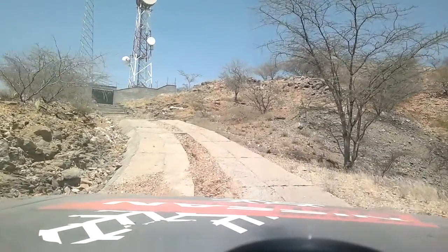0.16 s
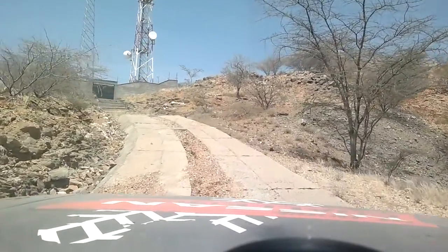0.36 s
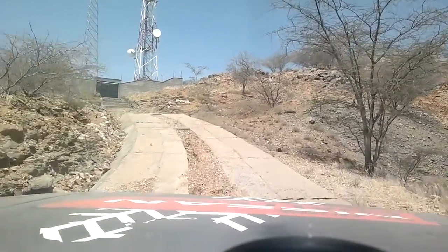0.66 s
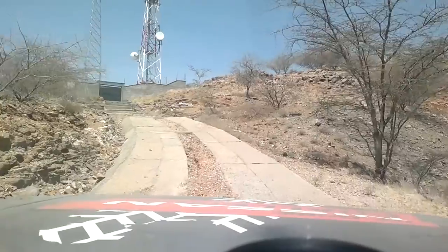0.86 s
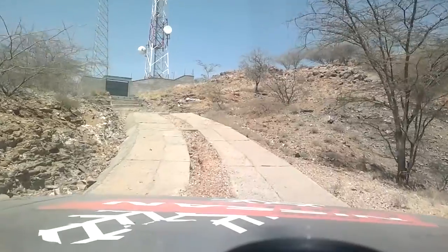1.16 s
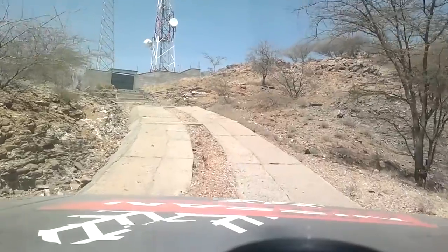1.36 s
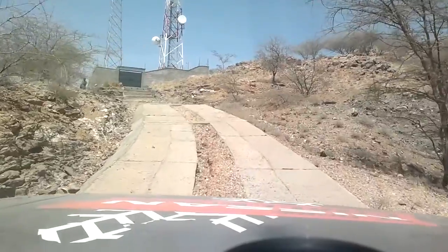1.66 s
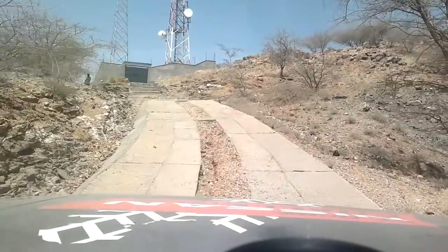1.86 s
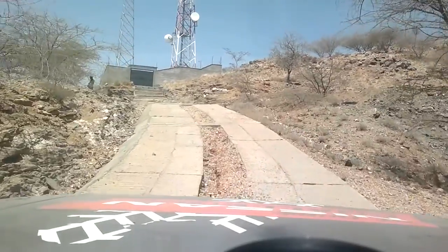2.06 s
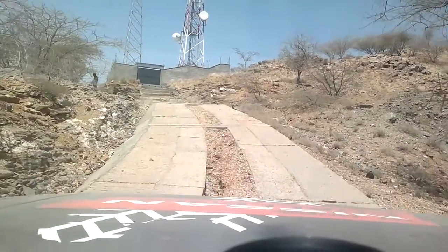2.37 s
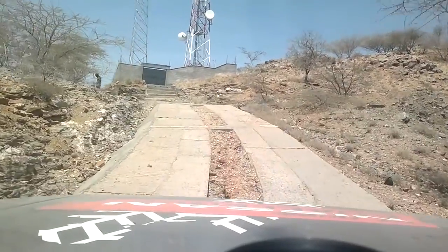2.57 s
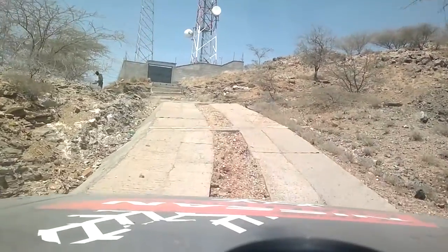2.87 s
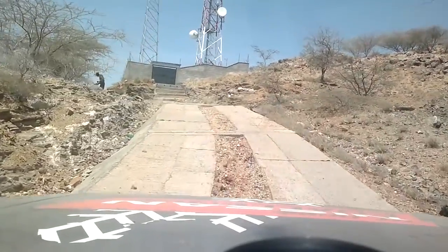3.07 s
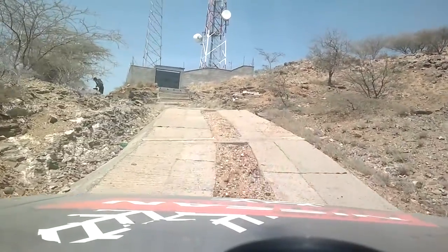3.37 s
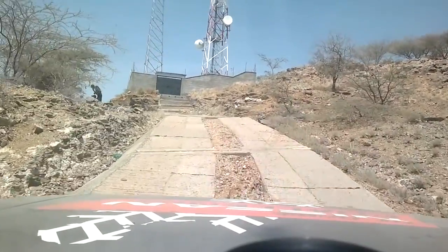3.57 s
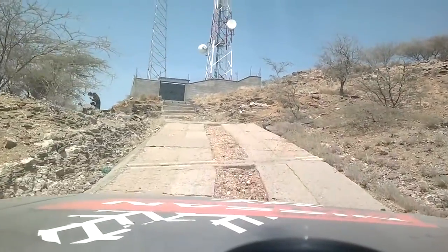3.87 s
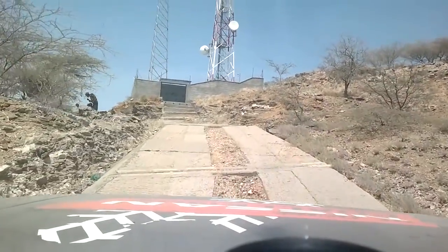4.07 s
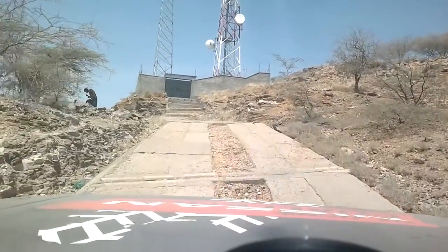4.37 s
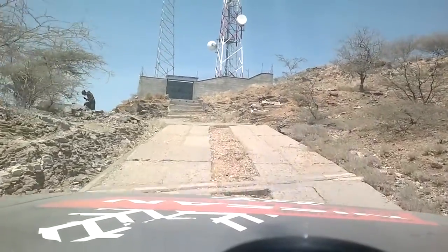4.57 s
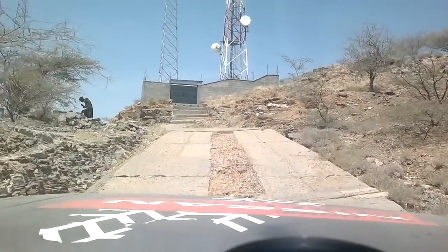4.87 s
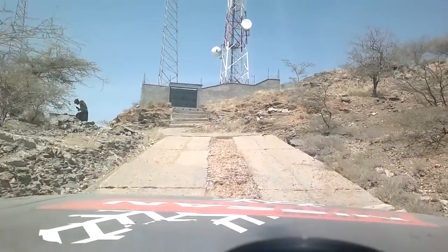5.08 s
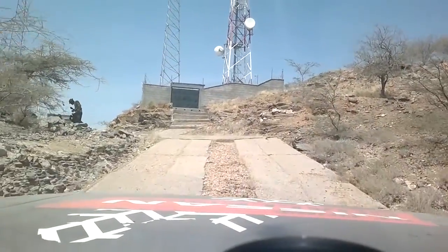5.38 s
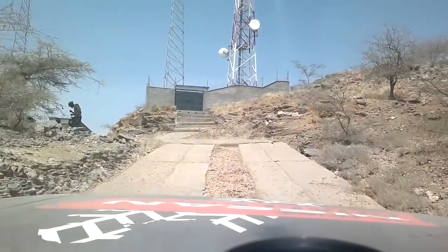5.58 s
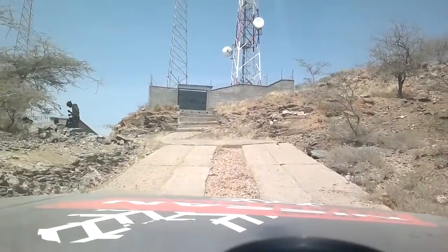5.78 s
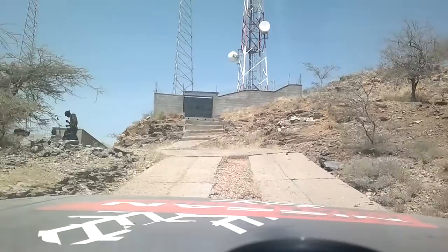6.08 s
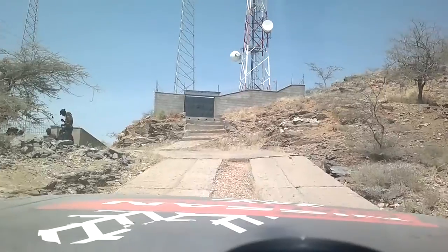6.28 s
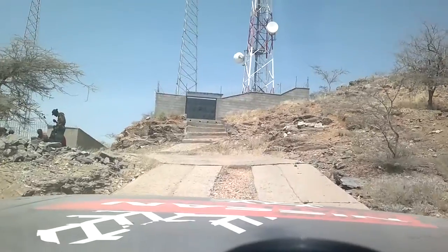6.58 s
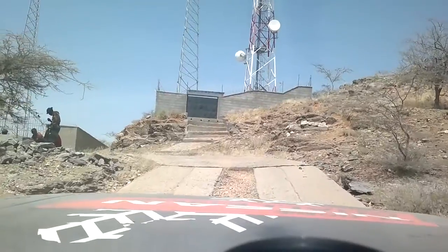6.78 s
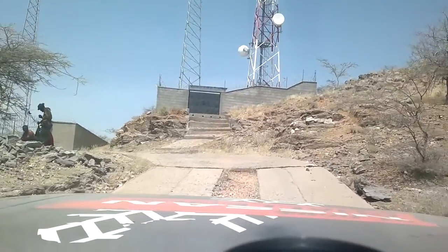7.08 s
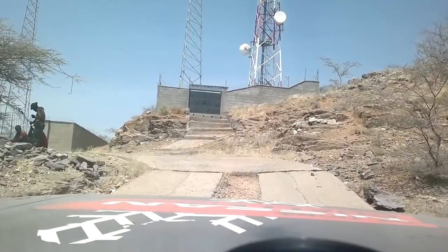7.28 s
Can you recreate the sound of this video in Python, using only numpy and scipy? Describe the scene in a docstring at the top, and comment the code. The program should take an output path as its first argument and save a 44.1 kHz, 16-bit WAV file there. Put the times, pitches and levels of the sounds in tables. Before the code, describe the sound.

Heard from inside a pickup cab, a diesel climbs a steep concrete track. Deep booms surge over slab bumps above steady tyre rumble, while plastic trim chirps and squeaks irregularly and fittings rustle. The engine drone rises slightly until about four seconds, with spells of gear hum and a faint metallic jingle, then eases and sags in pitch as short bumps come faster.

```python
"""A diesel pickup crawls up a steep concrete track, heard from inside the cab.
From the start the body booms over bumps in the slabs, tyres rumble, trim squeaks and fittings rustle.
The six-cylinder engine, a sum of crank orders and knocked noise, quickens until about 4 s; from about
2.2 s its gears hum in spells, and from about 2.5 s a loose metal part jingles as the body swings.
After 5.5 s the gear hum sinks, the engine eases off and its speed sags while the bumps come on."""
import sys
import numpy as np
from scipy import signal
from scipy.fft import rfft, irfft
from scipy.io import wavfile

SR = 44100
rng = np.random.default_rng(int(sys.argv[2]) if len(sys.argv) > 2 else 0)


def dump_mix(stems):
    """Bounce the given channels to the path in sys.argv[1] as a 16-bit WAV at rate SR."""
    frames = np.atleast_2d(stems).T  # one column per channel
    limited = np.clip(frames, -1, 1)  # hard clip at full scale
    pcm = np.round(limited * 32767).astype(np.int16)
    wavfile.write(sys.argv[1], SR, pcm)


N = 327654
TIME = np.arange(N) / SR
HZ = np.fft.rfftfreq(N, 1 / SR)

# how hard the truck works:
# (time [s], tyre rumble level [dB], clatter level before trim [dB], tread roar level [dB])
EFFORT = [(0.05, -22.5, -39, -43), (0.3, -27, -42.5, -43), (0.9, -30, -44, -46.5), (1.35, -29, -44, -45),
          (2.05, -28.5, -43.5, -44), (2.6, -26.5, -41, -40.5), (2.95, -28.5, -42, -44),
          (3.45, -25.5, -40, -41), (3.95, -31, -42.5, -44), (4.8, -28.5, -42.5, -43.5),
          (5.35, -24, -40.5, -41.5), (5.95, -29, -44, -45), (6.3, -24, -41.5, -40.5), (6.65, -24, -41, -42),
          (7.05, -25, -43, -45), (7.4, -25.5, -40, -41)]
# spectrum of the road rumble: (frequency [Hz], relative level [dB per Hz])
ROAD_SPECTRUM = [(12, -17), (23, 8), (29, 10.5), (48, 11.5), (65, 2.5), (100, -0.5), (140, 0.5),
                 (200, -1.5), (240, -6.5), (268, -6.5), (288, -7), (325, -11), (400, -19.5), (1000, -65.5)]
# spectrum of the tread roar: (frequency [Hz], relative level [dB per Hz])
ROAR_SPECTRUM = [(250, -22.5), (360, 0), (435, -0.5), (470, -3), (515, -4), (555, -12.5), (605, -6.5),
                 (700, -18), (1500, -52.5)]

# dry rustle of the shaken cab fittings: (time [s], level before trim [dB])
RUSTLE_LEVEL = [(0.02, -51), (0.2, -68), (0.37, -68), (0.52, -60.5), (0.66, -67), (0.93, -61.5),
                (1.42, -74), (1.79, -65), (1.98, -67.5), (2.39, -62), (2.81, -67), (4.1, -67), (5.4, -60.5),
                (5.82, -61.5), (6.7, -64), (7.03, -71), (7.3, -63), (7.43, -60)]
# spectrum of the rustle: (frequency [Hz], relative level [dB])
RUSTLE_SPECTRUM = [(2000, -23.0), (3500, 3.5), (5000, -2.5), (5800, -3.5),
                   (6800, -2.5), (8400, -7.5), (9300, -15.0), (10200, -8.5)]

# modes of the small loose metal part: (frequency [Hz], relative level [dB], time to fall 60 dB [s])
METAL_MODES = [(7335, -3, .06), (7369, -1, .09), (7698, -10, .1), (8060, -10, .1), (8430, -11, .1),
               (8850, -14, .1), (9204, -12, .12), (9600, -18, .1), (9930, -15, .12)]
# spells in which it is shaken: (middle [s], length [s], level [dB])
JINGLE_SPELLS = [(3.2, 1.3, -69), (5.5, 1.6, -72), (6.12, .25, -66), (6.39, .5, -61), (7.1, .9, -74)]

# resonances of the squeaking panel: (frequency [Hz], width [Hz], lift [dB])
PANEL_MODES = [(4025, 40, 4), (4240, 35, 8), (4330, 35, 7), (4400, 35, 3), (4480, 30, 5.5), (4570, 35, 3),
               (4705, 30, 8), (7650, 120, 5), (8030, 60, 3), (8680, 120, 5)]
# slips of the trim, levels before the panel: (start [s], length [s], level [dB], middle pitch [Hz],
# glide from start to end [Hz], octave level [dB], roughness [0 = smooth, about 1 = roughest])
SQUEAK_SLIPS = [(0, 0.07, -55.5, 4030, 94, -67, 1.2), (0.029, 0.078, -56, 4360, -100, -71, 0.74),
                (0.211, 0.04, -57.5, 4550, -100, -87, 0.58), (0.25, 0.06, -58, 4380, 178, -85, 0.5),
                (0.3, 0.05, -58, 3900, 1, -63, 0.75), (0.404, 0.077, -53, 4260, 0, -66, 0.53),
                (0.489, 0.1, -58, 4340, 221, -80, 0.8), (0.652, 0.043, -56.5, 4660, 136, -76, 0.38),
                (0.768, 0.072, -58.5, 4060, 63, -66, 0.8), (0.82, 0.17, -65, 4450, 1, -82, 0.68),
                (0.885, 0.042, -53, 4000, -86, -58, 0.4), (1.074, 0.08, -61, 4100, 400, -79, 0.9),
                (1.312, 0.11, -67.5, 4530, -2, -88.5, 0.4), (1.496, 0.057, -56.5, 4310, -100, -79, 0.57),
                (1.755, 0.074, -57, 4520, -560, -71, 0.7), (1.807, 0.17, -64, 3970, 0, -72, 0.5),
                (2.112, 0.11, -55.5, 4280, 87, -72, 0.58), (2.273, 0.035, -56, 3850, 0, -65, 0.7),
                (2.31, 0.042, -57, 4400, 60, -73, 0.48), (2.333, 0.087, -59, 4020, 0, -66, 1),
                (2.394, 0.064, -55.5, 4380, 121, -78, 0.4), (2.58, 0.046, -53, 3830, -2, -60, 0.3),
                (2.634, 0.052, -54, 4250, -65, -74, 0.58), (2.723, 0.053, -57, 4320, 98, -83.0, 0.5),
                (2.787, 0.082, -56.5, 4320, -220, -74.5, 0.47), (3.045, 0.04, -61, 4570, 0, -75, 0.6),
                (3.109, 0.07, -63, 4550, 200, -72, 0.6), (3.195, 0.064, -59, 4440, 1, -80, 0.4),
                (3.327, 0.027, -54.5, 4290, -3, -75, 0.63), (3.402, 0.15, -53.5, 4290, -58, -70, 0.8),
                (3.624, 0.1, -59.5, 4490, 197, -75, 0.65), (3.706, 0.156, -54.5, 4360, 0, -71.5, 0.37),
                (3.898, 0.09, -58.5, 4410, -57, -81, 0.52), (4.021, 0.05, -60.5, 4280, 0, -73, 0.43),
                (4.263, 0.083, -54.5, 4350, 0, -70.0, 0.5), (4.344, 0.14, -56.5, 4395, -1, -72, 0.35),
                (4.389, 0.021, -45, 4335, -5, -63, 0.25), (4.582, 0.11, -59, 4270, -50, -72, 0.45),
                (4.807, 0.056, -58, 4370, -100, -75, 0.6), (5.287, 0.047, -57, 4050, 115, -65.5, 0.6),
                (5.325, 0.14, -64, 4410, -7, -74, 0.5), (5.46, 0.079, -55, 4550, -100, -68, 0.55),
                (5.55, 0.051, -61.5, 4010, -2, -61, 0.38), (5.667, 0.05, -58, 4420, 0, -73, 0.7),
                (5.882, 0.091, -55, 4390, -43, -72, 0.53), (6.07, 0.056, -60, 4380, 0, -70, 0.68),
                (6.292, 0.029, -55, 4130, 100, -63, 0.78), (6.305, 0.043, -53, 4350, 0, -73, 0.65),
                (6.39, 0.065, -57, 4460, 82, -79, 0.52), (6.474, 0.057, -54.5, 4490, 4, -69.5, 0.8),
                (6.607, 0.1, -59, 3990, 199, -67, 1), (6.67, 0.083, -60, 4540, 0, -72, 0.8),
                (6.771, 0.06, -58, 4050, 100, -61, 0.97), (6.812, 0.026, -52, 4350, 0, -67, 0.55),
                (6.852, 0.082, -57, 4550, 0, -67.5, 0.68), (6.918, 0.056, -55, 4330, 0, -76, 0.3),
                (7.056, 0.039, -52.5, 4420, 4, -72, 0.9), (7.08, 0.032, -60, 4020, 3, -59, 0.38),
                (7.151, 0.043, -58, 4320, -120, -78.5, 0.6), (7.267, 0.059, -54, 4000, 221, -65, 0.68),
                (7.35, 0.068, -54, 4540, 60, -68, 0.6)]
# spectrum of the scrape of a rough slip: (frequency [Hz], relative level [dB per Hz])
SCRAPE_SPECTRUM = [(1500, -26), (3300, -2.5), (4000, 6.5), (5000, -1.5), (6800, -8), (8000, 0.5),
                   (9000, -13.5), (10500, -28.5)]

# bumps in the slabs, each a surge of the boom: (middle [s], length [s], level [dB])
BUMPS = [(0.06, 0.11, -9), (0.27, 0.8, -16.5), (0.52, 0.085, -10.5), (0.6, 0.12, -10.5), (0.77, 0.48, -10),
         (1.12, 0.32, -24), (1.3, 0.22, -11), (1.45, 0.19, -19.5), (1.73, 0.36, -11), (2.02, 0.23, -14),
         (2.63, 0.39, -11.5), (2.9, 0.3, -18.5), (3.3, 0.33, -14), (3.64, 0.36, -9), (3.84, 0.27, -9),
         (4.3, 0.3, -18.5), (4.55, 0.53, -13), (5.06, 0.38, -15.5), (5.42, 0.069, -14), (5.58, 0.21, -9),
         (5.79, 0.26, -15), (5.92, 0.043, -14.5), (6.05, 0.065, -13), (6.19, 0.067, -22),
         (6.5, 0.062, -14.5), (6.61, 0.064, -9.5), (6.69, 0.075, -10), (6.8, 0.088, -16.5),
         (7.05, 0.089, -11)]

# engine speed: (time [s], crank speed [turns/s])
CRANK_SPEED = [(0, 25.85), (0.9, 26.3), (1.2, 26.1), (1.85, 26.6), (2.15, 27.9), (2.42, 27.75),
               (2.68, 28.5), (2.85, 28.1), (3.05, 28.85), (3.27, 28.6), (3.55, 29.15), (3.8, 28.8),
               (4.08, 29.25), (4.33, 28.65), (4.52, 28.95), (4.8, 28.35), (5.15, 28.2), (5.55, 27.8),
               (5.8, 26.8), (6.05, 26.45), (6.3, 25.5), (7.0, 23.35), (7.43, 23.6)]
# gear hum, strong only while the engine runs fast: (time [s], level [dB])
GEAR_LEVEL = [(0, -58), (2.05, -57), (2.25, -46), (2.45, -50), (2.74, -39.5), (2.87, -53), (3.1, -41.5),
              (3.33, -51), (3.5, -40), (4.0, -43.5), (4.3, -47), (4.55, -42.5), (4.9, -51), (5.2, -42),
              (5.8, -57)]
# spectrum of the clatter through the bulkhead: (frequency [Hz], relative level [dB per Hz])
CLATTER_SPECTRUM = [(200, -14), (500, -1), (700, -4.5), (900, -0.5), (1150, -2.5), (1400, -5.5),
                    (1800, -6.5), (2300, -9), (3000, -13.5), (3700, -17), (5000, -20.5), (7000, -26),
                    (8800, -37), (10000, -40)]
# ringing parts of the engine: (frequency [Hz], width [Hz], level [dB])
ENGINE_RINGS = [(746, 20, -61), (1055, 26, -62), (1275, 26, -57), (1464, 22, -60.5), (1530, 26, -63),
                (1606, 26, -61.5), (1760, 30, -66), (1975, 30, -65.5), (2220, 100, -63), (2380, 70, -65),
                (2830, 70, -70), (3370, 100, -70)]
# unlike cylinders, in firing order: (relative knock strength)
CYLINDER_STRENGTH = np.array([1, -1, 0, 1, 0, -1])
# how far the engine eases off: (time [s], easing [0-1])
EASING = [(0, 0.31), (2, 0.07), (5.7, 0), (6.3, 0.93), (7.43, 0.9)]
# the two strong, clean engine tones: (time [s], firing tone level [dB], its octave level [dB])
CLEAN_TONES = [(0, -35, -41), (0.35, -44, -38), (1.0, -39, -42), (1.6, -42, -39), (1.8, -34, -43),
               (2.0, -41, -44), (2.17, -28, -36), (2.45, -33, -41), (2.95, -30, -34), (3.15, -34.5, -28.5),
               (3.7, -31, -35), (4.23, -35, -29), (4.57, -38, -39), (4.85, -30, -32), (5.45, -27, -34),
               (5.78, -36, -43), (6.3, -37, -48), (7.43, -36, -45)]
# weaker, less steady orders, before the cab's lift:
# (multiple of crank speed, level while pulling [dB], level while easing off [dB])
WEAK_ORDERS = [(4, -45, -50), (4.5, -45.5, -48), (5, -40.5, -50), (7, -43, -50), (7.5, -48, -41.5),
               (8.5, -46.5, -41), (9, -54, -50), (11, -55, -55)]
# air resonances of the cab: (frequency [Hz], width [Hz], lift [dB])
CAB_MODES = [(175, 13, 7.5), (203, 14, 4.5), (224, 10, 5), (246, 10, 4), (286, 14, 4)]

SQUEAK_ATTACK_S, SQUEAK_RELEASE_S = 0.006, 0.036  # catches quickly, lets go more slowly
SQUEAK_JITTER_HZ = 175  # rms at roughness 1
CAB_T60_S, CAB_WET = .19, .85  # echo decay time, and level against the direct sound
BOOM_HZ, BOOM_DRIFT_HZ = 36.1, 1.2  # the body's lowest mode, and its rms drift
TREMBLE_DB = -26  # middle level of the boom between bumps
FIRINGS_PER_TURN, GEAR_ORDER = 3, 14  # cycles in each turn of the crank
KNOCK = .65  # typical strength of each knock over the steady clatter
KNOCK_DECAY = .5  # share of the gap between firings in which a knock falls to 1/e
SHAKE_DB = -28.5  # level of the crank shake
WAVER_DB, SLIP_RAD = 1.7, .22  # rms waver in level and slip in phase of the weaker orders


def amp(db):
    """Level law: decibels to amplitude gain."""
    return 10 ** (np.asarray(db) / 20)


def unit(x):
    """Normalisation of power: scales to rms 1."""
    return x / np.sqrt(np.mean(x ** 2) + 1e-20)


def curves(rows):
    """Linear interpolation: one value per sample for each column of a table over time."""
    s, *columns = np.transpose(rows)
    return [np.interp(TIME, s, c) for c in columns]


def colour(x, points):
    """Spectral shaping: filters x by a spectrum drawn on a log-frequency axis, to rms 1."""
    f, db = np.transpose(points)
    gain = amp(np.interp(np.log(HZ + 1), np.log(f), db))
    return unit(irfft(rfft(x) * gain, N))


def wander(rate):
    """Low-passed chance: noise of rms 1 whose spectrum falls to 1/e at rate in Hz."""
    return unit(irfft(rfft(rng.standard_normal(N)) * np.exp(-(HZ / rate) ** 2), N))


def turns(hz):
    """Phase as the integral of frequency, in radians."""
    return 2 * np.pi * np.cumsum(hz) / SR


def swells(rows):
    """Power addition: gain curve of rounded surges, one for each (middle, length, level)."""
    power = 0
    for middle, length, db in rows:
        surge = amp(db) * np.cos(np.pi * np.clip((TIME - middle) / length, -.5, .5))
        power = power + surge ** 2
    return np.sqrt(power)


def lift(hz, resonances):
    """Resonance: decibels added at hz by a set of bell-shaped peaks."""
    return sum(db / (1 + (2 * (hz - centre) / width) ** 2) for centre, width, db in resonances)


def road(rumble_db, roar_db, patchy_db=1.5):
    """Broadband rolling excitation: tyres on rough concrete rumble through the floor, and their tread roars."""
    rumble = colour(rng.standard_normal(N), ROAD_SPECTRUM) * amp(rumble_db)
    roar = colour(rng.standard_normal(N), ROAR_SPECTRUM) * amp(roar_db)
    return (rumble + roar) * amp(patchy_db * wander(13))


def rustle(grain_db=0.0, clump_db=3.0, trim_db=4.5):
    """Frictional noise: fittings chafe against each other in many tiny slips."""
    slips = rng.standard_normal(N) * amp(grain_db * wander(150) + clump_db * wander(19))
    level_db = curves(RUSTLE_LEVEL)[0] + trim_db
    return amp(level_db) * colour(slips, RUSTLE_SPECTRUM)


def jingle(sway, uneven_db=2.0, contact_s=0.0043):
    """Free vibration after impact: a loose metal part is tapped once in each swing of the body."""
    swing_starts = np.diff(np.floor(sway / (2 * np.pi)), prepend=0)
    taps = swing_starts * amp(uneven_db * rng.standard_normal(N))
    t = TIME[:SR // 5]
    ring = sum(amp(db - 60 * t / t60) * np.sin(2 * np.pi * hz * t) for hz, db, t60 in METAL_MODES)
    ring = ring * (1 - np.exp(-t / contact_s))  # soft onset
    return swells(JINGLE_SPELLS) * unit(signal.fftconvolve(taps, ring)[:N])


def panel(x):
    """Forced resonance: the panel passes a squeak on and rings briefly at its own modes."""
    gain = 1 + sum((amp(db) - 1) / (1 + 2j * (HZ - hz) / width) for hz, width, db in PANEL_MODES)
    return irfft(rfft(x) * gain, N)


def squeak(sway, rest_hz=4400, creep_db=-73, scrape_db=-3.0, flutter_db=2.5, throb_db=2.5):
    """Stick-slip friction: trim creeps faintly and breaks into short gliding squeaks as the cab twists."""
    jitter = SQUEAK_JITTER_HZ * wander(350)
    wobble_hz = 35 * np.sin(sway)
    scrape = amp(scrape_db) * colour(rng.standard_normal(N), SCRAPE_SPECTRUM)
    out = amp(creep_db) * np.sin(turns(rest_hz + jitter))
    for start, length, db, pitch_hz, glide_hz, octave_db, rough in SQUEAK_SLIPS:
        end = start + length + SQUEAK_RELEASE_S
        now = slice(max(0, round(start * SR)), round(end * SR))
        t = TIME[now] - start
        release = (length - t) / SQUEAK_RELEASE_S + .5  # half the release lies beyond length
        envelope = np.clip(np.minimum(t / SQUEAK_ATTACK_S, release), 0, 1)
        glide = glide_hz * (t / length - .5)
        angle = turns(pitch_hz + glide + rough * (jitter[now] + wobble_hz[now]))
        tone = amp(db) * np.sin(angle) + amp(octave_db) * np.sin(2 * angle)
        out[now] += envelope * (np.sqrt(2) * tone + rough * amp(db) * scrape[now])
    # all slips flutter, and throb with the body's swing
    throb = unit(amp(flutter_db * wander(170) + throb_db * np.sin(sway)))
    return panel(out * throb)


def cab_echo(x):
    """Diffuse reverberation: glass and panels scatter high sounds into a short, dense tail."""
    t = TIME[:round(CAB_T60_S * SR)]
    tail = rng.standard_normal(len(t)) * amp(-60 * t / CAB_T60_S)
    echo = signal.fftconvolve(x, tail / np.linalg.norm(tail))[:N]
    return (x + CAB_WET * echo) / np.hypot(1, CAB_WET)


def body(sway, tremble_spread_db=3.5):
    """Excitation of the lowest mode: the body trembles all the way, and each bump makes its boom surge."""
    tremble = amp(TREMBLE_DB + tremble_spread_db * wander(22.0))
    return np.sqrt(2) * np.hypot(tremble, swells(BUMPS)) * np.sin(sway)


def gears(crank, slip_rad=0.55):
    """Tooth-meshing tone: the gears hum in short spells at a fixed multiple of the crank speed."""
    angle = turns(GEAR_ORDER * crank) + slip_rad * wander(10)
    return np.sqrt(2) * amp(curves(GEAR_LEVEL)[0]) * np.sin(angle)


def clatter(crank, level_db, uneven_db=1.5, trim_db=-1.1):
    """Impulsive combustion: each firing knocks noise out of the block and sets engine parts ringing."""
    firings = FIRINGS_PER_TURN * turns(crank) / (2 * np.pi)
    cylinder_db = uneven_db * CYLINDER_STRENGTH[firings.astype(int) % 6]
    burn_db = 4 * np.tanh(wander(60))  # no two charges burn alike
    decay = np.exp(-(firings % 1) / KNOCK_DECAY)
    puffs = 1 + KNOCK * amp(cylinder_db + burn_db) * decay
    # part of the noise repeats every cycle of six firings
    pattern = unit(np.interp(firings % 6, np.linspace(0, 6, 600), rng.standard_normal(600)))
    burst = puffs * (rng.standard_normal(N) + .3 * pattern)
    out = colour(burst, CLATTER_SPECTRUM) * amp(level_db + trim_db)
    # the ringing follows the effort by half as many decibels
    drive = rfft(puffs * rng.standard_normal(N) * amp(.5 * level_db))
    for hz, width, db in ENGINE_RINGS:
        out += amp(db) * unit(irfft(drive / (1 + 2j * (HZ - hz) / width) ** 2, N))
    return out


def drone(crank, tone_slip_rad=0.089):
    """Harmonic orders of rotation: strong ones sound clean, weak ones waver and swell in the cab's modes."""
    angle = turns(crank)
    ease = np.clip(curves(EASING)[0], 0, 1)
    firing_db, octave_db = curves(CLEAN_TONES)
    clean = [(1, SHAKE_DB), (FIRINGS_PER_TURN, firing_db), (2 * FIRINGS_PER_TURN, octave_db)]
    out = np.zeros(N)
    for order, db in clean:
        phase = tone_slip_rad * wander(16.0) + rng.uniform(0, 2 * np.pi)
        out += amp(db) * np.sin(order * angle + phase)
    for order, pull_db, ease_db in WEAK_ORDERS:
        db = pull_db + ease * (ease_db - pull_db)
        db = db + lift(order * crank, CAB_MODES) + WAVER_DB * wander(4.1)
        phase = SLIP_RAD * wander(10) + rng.uniform(0, 2 * np.pi)
        out += amp(db) * np.sin(order * angle + phase)
    return np.sqrt(2) * out


def scene():
    """Superposition: road, loose parts, body and engine add at one spot in the cab."""
    crank = curves(CRANK_SPEED)[0]
    rumble_db, clatter_db, roar_db = curves(EFFORT)
    sway = turns(BOOM_HZ + BOOM_DRIFT_HZ * wander(12))
    loose_parts = rustle() + jingle(sway) + cab_echo(squeak(sway))
    engine = gears(crank) + clatter(crank, clatter_db) + drone(crank)
    return (road(rumble_db, roar_db) + loose_parts + body(sway) + engine)[None]


def record(dry):
    """Band limitation: a linear-phase low-pass at 10.2 kHz."""
    low_pass = signal.firwin(401, 10200, window=("kaiser", 9), fs=SR)
    return signal.oaconvolve(dry, low_pass[None], "same")


dry = scene()
out = record(dry)
dump_mix(out)
```